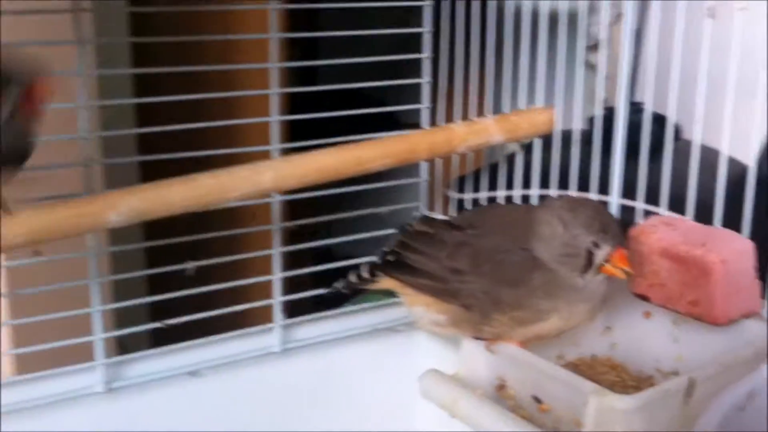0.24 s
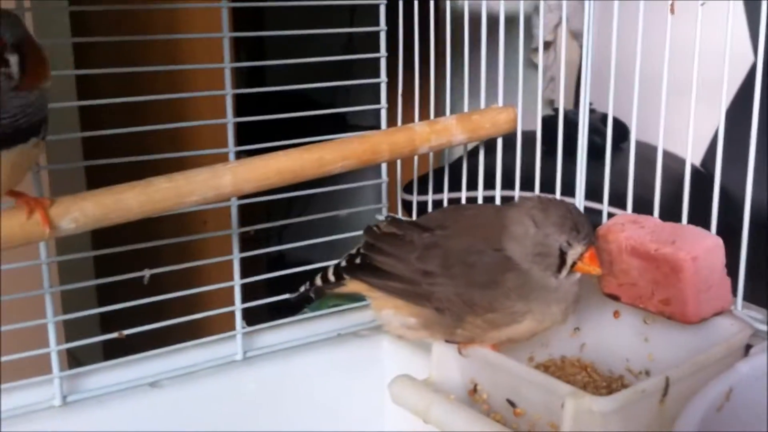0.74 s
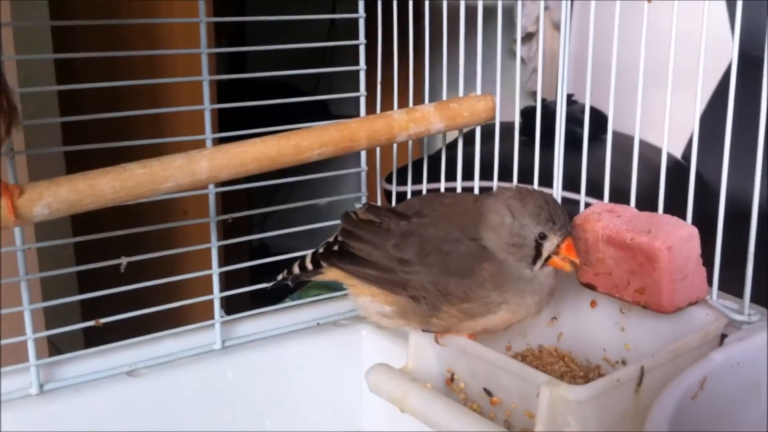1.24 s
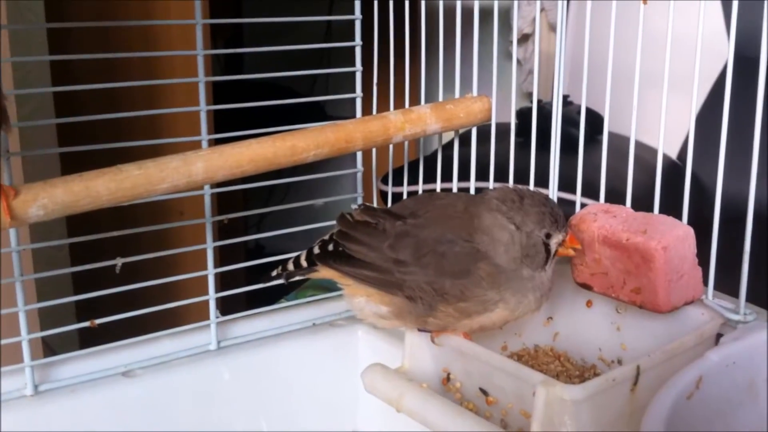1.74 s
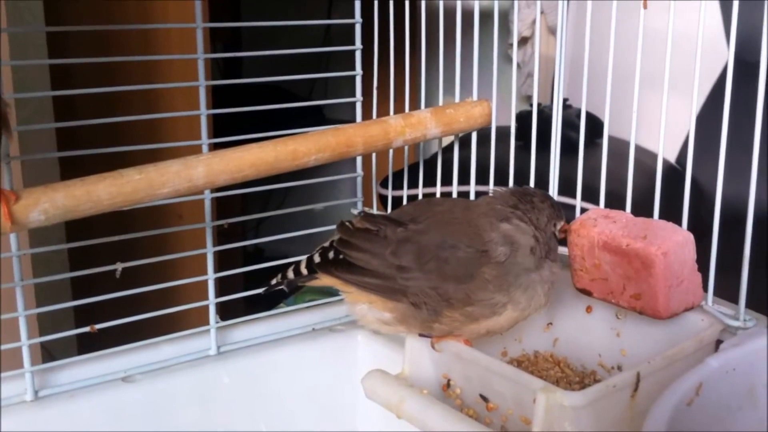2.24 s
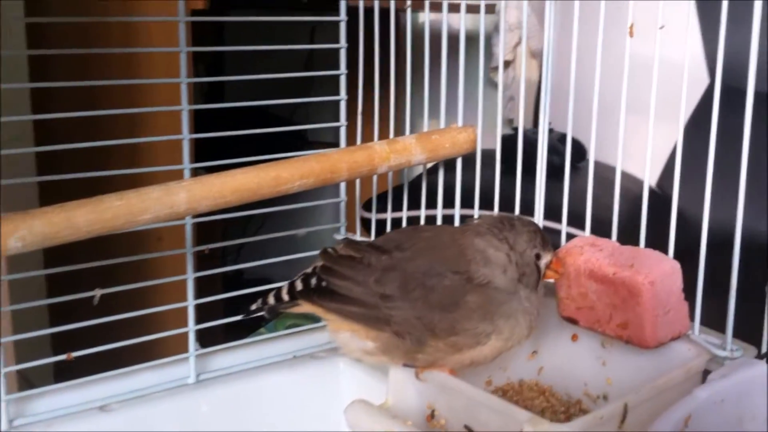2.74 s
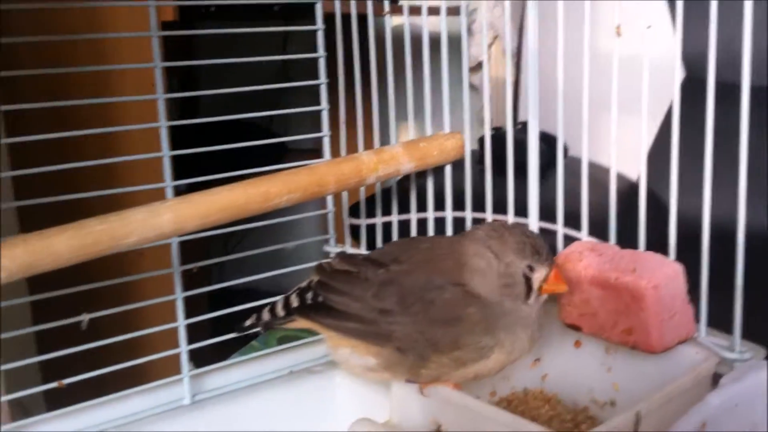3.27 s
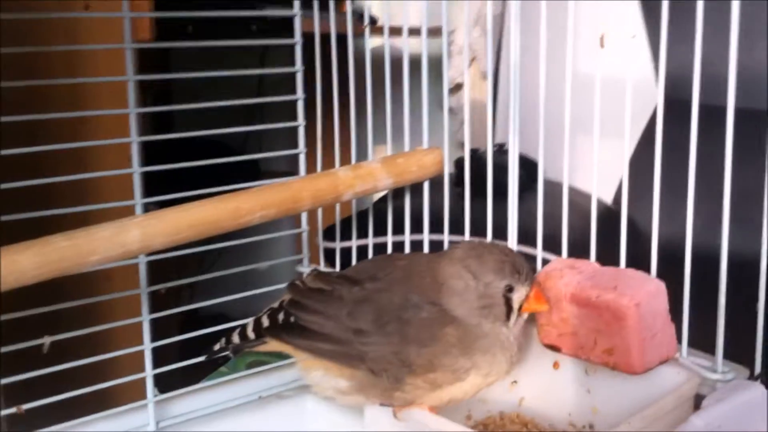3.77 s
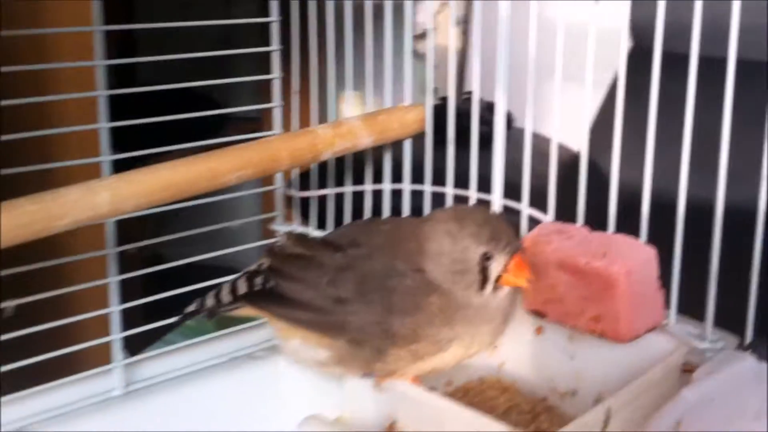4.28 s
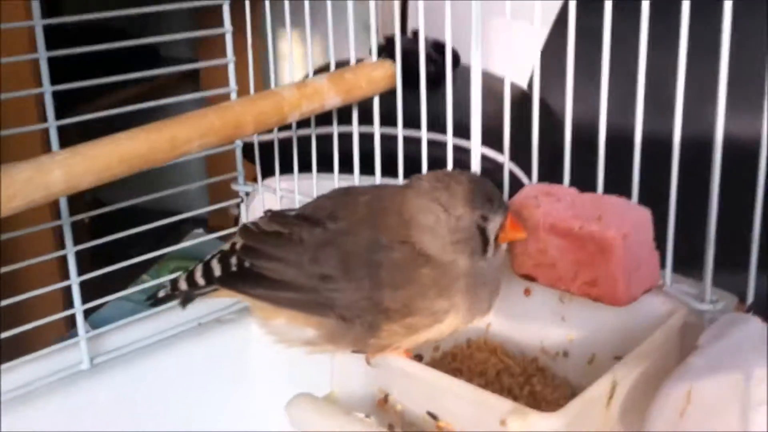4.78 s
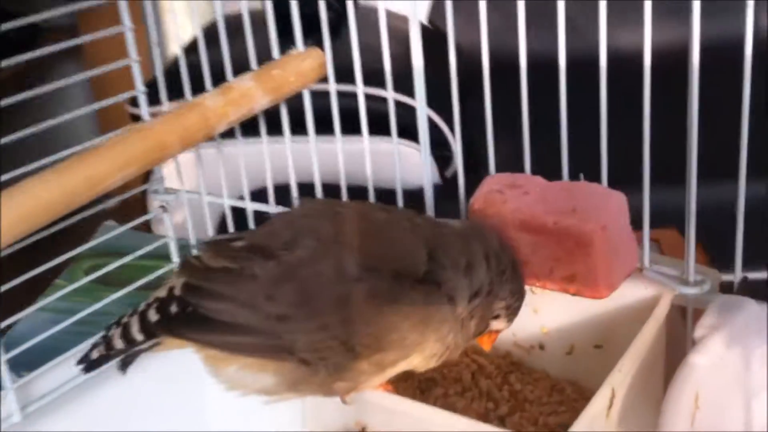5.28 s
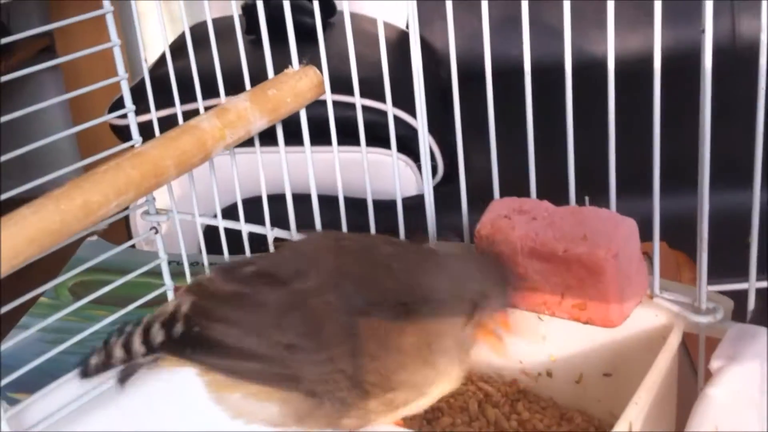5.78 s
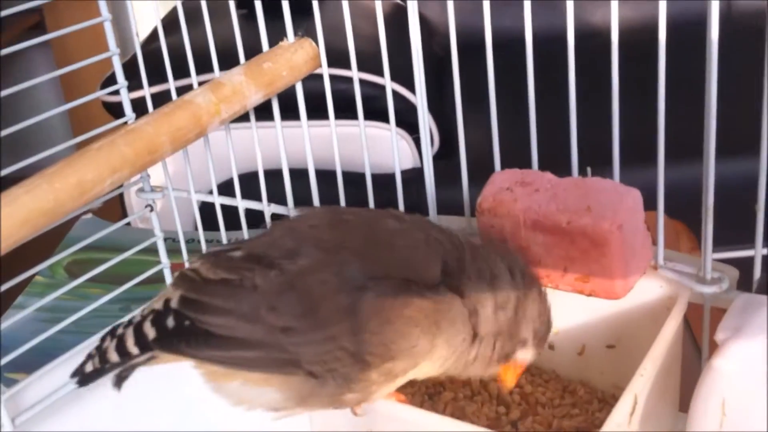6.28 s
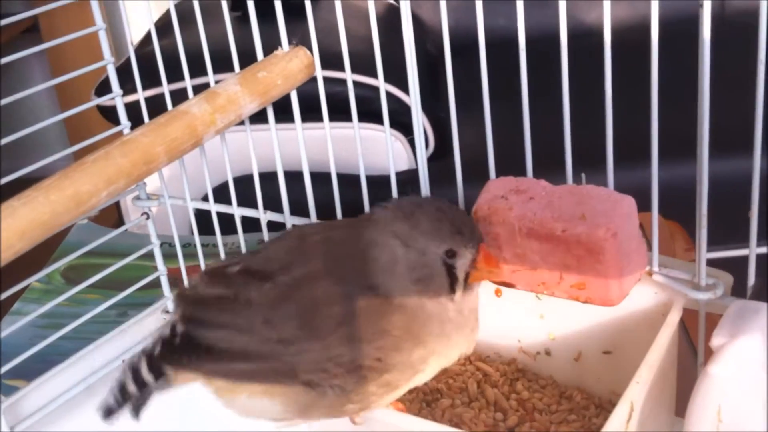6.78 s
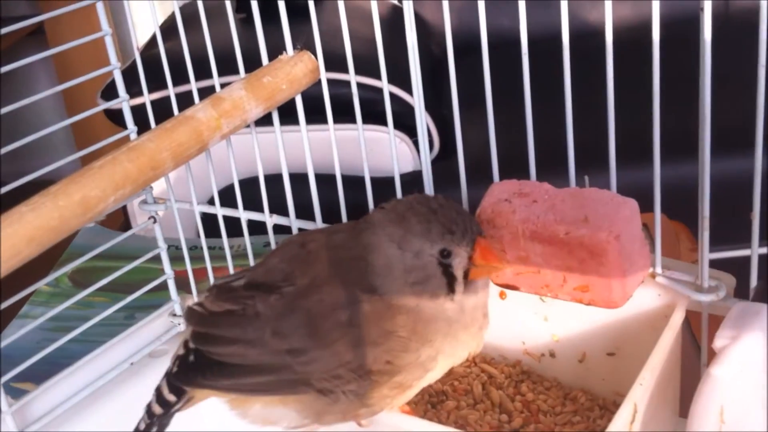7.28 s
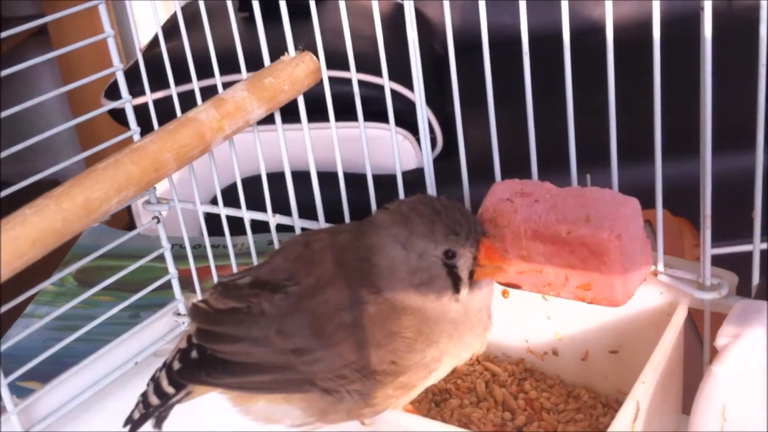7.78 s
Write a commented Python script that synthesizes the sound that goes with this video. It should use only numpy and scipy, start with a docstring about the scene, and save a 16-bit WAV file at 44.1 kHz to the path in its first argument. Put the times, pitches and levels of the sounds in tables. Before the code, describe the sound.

Close mono sound of a small cage bird indoors over very low room murmur and hiss. Light claw taps on perch and bars, then hesitant raspy peeps, lead into a rhythmic, nasal, toy-trumpet-like song. Each half-second phrase runs from chirp through buzzy harmonic tones to a brief thin whistle. Three bouts of three phrases are separated by small pauses and introductory notes, the singing growing brighter and stronger as it goes on.

```python
"""A zebra finch sings in its cage in a quiet room, close to a mono microphone.
Soft introductory notes lead into three bouts of one motif, sung three times in each: a chirp that
runs into a long stack, a swooping stack, a soft buzz and a whistle. Each is a set of gliding harmonics
shaped by throat and beak. Between songs, small taps of ringing noise sound from the cage.
Shaped noise makes the room's murmur and hiss, and random echoes answer the bird and the cage."""
import sys
import numpy as np
from scipy import signal
from scipy.fft import rfft, irfft, next_fast_len
from scipy.io import wavfile
from scipy.ndimage import map_coordinates

SR = 44100
rng = np.random.default_rng(int(sys.argv[2]) if len(sys.argv) > 2 else 0)


def unload_wav(signal):
    """Save mono or channel-first audio to the path in sys.argv[1] as 16-bit WAV at rate SR, clipped to [-1, 1]."""
    wavfile.write(
        sys.argv[1],
        SR,
        np.round(np.clip(np.atleast_2d(signal).T, -1, 1) * 32767).astype(np.int16),
    )


N = 353682  # length in samples, about 8 s
TOP_HZ = 16100  # nothing sounds above this


def amp(db):
    """Turn decibels into an amplitude factor."""
    return 10 ** (np.asarray(db) / 20)


def unit(x):
    """Scale a sound to an average (RMS) strength of 1."""
    return x / np.sqrt(np.mean(x ** 2) + 1e-20)


def along(points, hz):
    """Read a curve of (Hz, value) points on a log frequency axis."""
    f, v = np.transpose(points)
    return np.interp(np.log(hz + 1), np.log(f + 1), v)


def wobble(rate, size):
    """A smooth random curve through `rate` random points a second."""
    knots = rng.standard_normal(int(size * rate / SR) + 4)
    return map_coordinates(knots, [np.arange(size) * rate / SR])


def filtered(x, response):
    """Shape the spectrum of x by a response, given as a function of frequency."""
    m = next_fast_len(len(x) + SR // 2)
    spectrum = rfft(x, m) * response(np.fft.rfftfreq(m, 1 / SR))
    return irfft(spectrum, m)[:len(x)]


def causal(gain):
    """Complex log response of the filter that has this gain and never answers before its input."""
    cepstrum = irfft(np.log(gain))
    half = len(cepstrum) // 2
    return rfft(np.r_[cepstrum[0], 2 * cepstrum[1:half]], 2 * half)


def add(track, s, sound):
    """Mix a sound in at s seconds."""
    start = max(round(s * SR), 0)
    track[start:start + len(sound)] += sound[:max(N - start, 0)]


# Spectrum of the quiet room: pitch_hz, relative_db (per Hz)
HUSH_SPECTRUM = [(15, -36.5), (25, -30.5), (84, -21.5), (206, -8.5), (545, -14.5), (796, -15.5),
                 (2280, -22), (5570, -22.5), (16000, -27)]


def hush(level_db=-65):
    """The low murmur of the house and a faint hiss: shaped noise whose level drifts slowly."""
    noise = filtered(rng.standard_normal(N), lambda hz: amp(along(HUSH_SPECTRUM, hz)))
    return unit(noise) * amp(level_db + 1.2 * wobble(3.6, N))


# Taps on perch and bars: start_s, level_db (the click and ring levels are added)
TAPS = [(0.094, -53.5), (0.123, -41.5), (0.149, -47.5), (0.253, -45.5), (0.386, -45), (3.114, -45),
        (3.155, -45)]
# Resonances of the cage: pitch_hz, width_hz, relative_db
CAGE_RESONANCES = [(279.6, 110, 0), (608, 14, 6), (1052, 59, 6), (1680, 360, -11)]


def taps(click_db=-14, ring_db=-11, click_t60=0.36, ring_t60=0.44):
    """Claws and beak scuff on perch and bars; the cage rattles after. A t60 is seconds to fall 60 dB."""
    track, t = np.zeros(N), np.arange(SR // 2) / SR

    def cage_body(f):
        return sum(amp(db) * 1j * f * width / (centre * centre - f * f + 1j * f * width)
                   for centre, width, db in CAGE_RESONANCES)

    for s, db in TAPS:
        ring = unit(filtered(rng.standard_normal(len(t)), cage_body)) * amp(ring_db - 60 * t / ring_t60)
        click = rng.standard_normal(len(t)) * amp(click_db - 60 * t / click_t60)
        onset = 1 - np.exp(-t / 0.00078)
        add(track, s, amp(db) * (click + ring) * onset)
    return track


EDGE_DB, EDGE_CURVE = 14, 1.98  # a glide swells from and fades to this far below its level, along this power
SAG_OCT_PER_S = 0.756  # a held note sinks slowly
ONSET_ROUGH, SETTLE_S = 0.52, 0.0072  # extra roughness at each start, and how quickly it dies away
END_ROUGH = .3  # extra roughness as the air pressure fails


def gesture_of(glides, count=48):
    """Chain glides of the syrinx, the bird's voice organ, into rows of (s, pitch Hz, level dB, roughness)."""
    u, start, rows = np.linspace(0, 1, count, endpoint=False), 0, []
    for length, start_hz, target_hz, bend, db, attack, release, rough in glides:
        t = u * length
        glide = np.expm1(bend * u) / np.expm1(bend)  # moves late if bend is positive, early if negative
        hz = start_hz * (target_hz / start_hz) ** glide * 2 ** (-SAG_OCT_PER_S * t)
        rising = np.maximum(1 - t / attack, 0)
        fading = np.maximum(1 - (length - t) / release, 0)
        level_db = db - EDGE_DB * np.maximum(rising, fading) ** EDGE_CURVE
        roughness = rough + ONSET_ROUGH * np.exp(-t / SETTLE_S) + END_ROUGH * fading ** 2
        rows.append(np.c_[start + t, hz, level_db, roughness])
        start += length
    return np.vstack(rows)


FOCUS_HZ, FOCUS_WIDTH_HZ = 3900, 1400  # the band that focus_db raises or lowers
FLUTTER_DB = 1.1  # the air pressure trembles a little


def syllable(glides, tract, pitch=1, length=1, treble_db=0, beak_hz=None, dip_hz=None,
             swell_db=0, hoarse=0, climb=0, focus_db=0):
    """The syrinx buzzes along its glides; its harmonics move through the resonances of throat and beak."""
    s, hz, db, rough = np.transpose(gesture_of(glides))
    t = np.arange(int(s[-1] * length * SR)) / SR / length
    size, progress = len(t), t / s[-1] - .5  # progress runs from -0.5 to 0.5
    rough = np.clip(np.hypot(np.interp(t, s, rough), hoarse), 0, 1)
    jitter = .03 * rough * wobble(900, size) + .003 * wobble(120, size)
    f0 = pitch * 2 ** (climb * progress) * np.exp(np.interp(t, s, np.log(hz)) + jitter)

    grid = np.linspace(0, SR / 2, 513)
    colour_db = along(tract, grid) + treble_db * along([(3000, 0.37), (9000, 0.73)], grid)
    colour_db = colour_db + focus_db * np.exp(-((grid - FOCUS_HZ) / FOCUS_WIDTH_HZ) ** 2)
    if beak_hz:  # the gape moves one resonance and one hollow from song to song
        colour_db = colour_db + 8 * np.exp(-((grid - beak_hz) / 600) ** 2)
        colour_db = colour_db - 10 * np.exp(-((grid - dip_hz) / 450) ** 2)
    else:  # short notes take a chance colour from the pose of the head
        colour_db = colour_db + 2.2 * wobble(3000, len(grid))

    k = np.arange(1, int(TOP_HZ / hz.min()) + 1)[:, None]  # harmonic numbers
    partials = np.exp(np.interp(k * f0, grid, causal(amp(colour_db)))) * (k * f0 < TOP_HZ)
    # stretched tight or blown softly, the membranes swing like a sine; slack and blown hard, they snap shut
    level_db = np.interp(t, s, db)
    purity_db = along([(1700, 0.5), (3400, 20.9)], f0) + 0.22 * np.maximum(-3.5 - level_db, 0)
    partials = partials * amp(-(k - 1) * purity_db)
    partials = partials * amp(2.86 * np.array([wobble(46.6, size) for _ in k]))  # each drifts in strength
    partials = partials / np.sqrt(np.sum(abs(partials) ** 2, axis=0) / 2 + 1e-20)

    # where the vibration turns chaotic, every harmonic spreads into a band
    chaos = np.array([wobble(801, size) + 1j * wobble(797.7, size) for _ in k]) / np.sqrt(2)
    smear = .7 * rng.standard_normal(k.shape)  # the harmonics arrive a little out of step
    cycles = np.exp(1j * (2 * np.pi * k * np.cumsum(f0) / SR + smear))
    voice = np.sum(partials * (np.sqrt(1 - rough ** 2) + rough * chaos) * cycles, axis=0).real
    loudness = amp(level_db + swell_db * progress + FLUTTER_DB * wobble(126.8, size))
    return voice * loudness * signal.windows.tukey(size, .03)


# Times of the introductory notes: start_s, level_db (each glide's own level is added)
INTRO_TIMES = [(.425, -49), (.729, -45.5), (0.891, -40), (1.042, -38), (1.372, -37.5), (3.965, -44),
               (4.183, -40), (4.314, -39), (6.347, -36.5)]
# Glides of one note, before softer notes are lowered:
# length_s, start_hz, target_hz, bend, level_db, attack_s, release_s, roughness (0-1)
INTRO_GLIDES = [(.011, 905, 841, 1.7, -7.5, 0.0058, 0.00069, 0),
                (.042, 736.3, 437, -1.2, 1.5, .011, 0.018, 0.23)]
# Throat and beak colour: pitch_hz, relative_db
INTRO_TRACT = [(450, -10.5), (1000, -0.5), (2300, -5), (3300, -7), (5400, -8.5), (6500, -11), (8600, -7),
               (15000, -18.5)]
INTRO_FULL_DB, INTRO_TREBLE_DB = -39.5, 10  # a full-voiced introductory note and its treble tilt
INTRO_OCT_PER_DB, INTRO_TREBLE_PER_DB = .022, 2  # softer ones are lower and duller


def introductory_notes(song):
    """Short rough notes; blown more softly, they sound lower and duller."""
    for s, db in INTRO_TIMES:
        shy_db = max(INTRO_FULL_DB - db, 0)
        note = syllable(INTRO_GLIDES, INTRO_TRACT, 2 ** (-INTRO_OCT_PER_DB * shy_db),
                        treble_db=INTRO_TREBLE_DB - INTRO_TREBLE_PER_DB * shy_db)
        add(song, s, amp(db) * note)


# Glides: length_s (before stretching), start_hz, target_hz, bend, level_db, attack_s, release_s, roughness (0-1)
CHIRP_GLIDES = [(0.0248, 1109, 1011, 3.3, -4.5, 0.0085, 0.0041, .16),
                (.03, 1542, 1096, 3.2, 0, .009, 0.0099, 0.19)]
# Throat and beak colour: pitch_hz, relative_db
CHIRP_TRACT = [(1050, -4.5), (2200, -4.5), (3100, -5), (4300, 3), (6300, -7.5), (9200, -5.5),
               (12500, -19.5), (15000, -15)]


def opening_chirp(stretch, focus_db):
    """Two quick falling glides, stretched with the motif."""
    return syllable(CHIRP_GLIDES, CHIRP_TRACT, length=stretch, focus_db=focus_db)


# Glide: length_s (before stretching), start_hz, target_hz, bend, level_db, attack_s, release_s, roughness (0-1)
STACK_GLIDES = [(.096, 851.4, 700.4, 9, 0, 0.031, 0.017, 0.071)]
# Throat and beak colour: pitch_hz, relative_db
STACK_TRACT = [(800, -14), (1650, -6.5), (3300, 3), (4300, 4), (5000, 1.5), (5800, -8), (7300, -18.5),
               (9100, -4.5), (12700, -32), (15000, -12)]


def long_stack(stretch, beak_hz, dip_hz, focus_db):
    """A held stack of harmonics that drops late, coloured by the gape of the beak."""
    return syllable(STACK_GLIDES, STACK_TRACT, length=stretch, beak_hz=beak_hz, dip_hz=dip_hz,
                    focus_db=focus_db)


# Glides, before the pitch ratio: length_s, start_hz, target_hz, bend, level_db, attack_s, release_s, roughness (0-1)
SWOOP_GLIDES = [(.012, 7546, 1247, .3, -7.5, 0.0048, 0.0046, .5),
                (.041, 884.5, 877, 4.8, -1, 0.008, 0.0015, .04),
                (.047, 590, 466, 1.6, -0.5, .001, 0.024, 0.12)]
# Throat and beak colour: pitch_hz, relative_db
SWOOP_TRACT = [(550, -20), (900, -8), (1750, -9.5), (2700, 1.5), (5100, 1), (6100, -9), (7800, -14),
               (9100, -2.5), (12500, -25), (15000, -10)]
# The bird warms up and its swoop settles: (first motif, last motif)
SWOOP_PITCH = (1.05, .98)  # ratio
SWOOP_SWELL_DB = (3.5, -5)  # the weight moves from the end of the swoop to its start
SWOOP_TREBLE_DB = (-0.5, 3)  # treble tilt
SWOOP_HOARSE = (.32, .02)  # roughness 0-1
SWOOP_GAPE = (1.34, 1.1)  # ratio by which the beak resonance lies higher than in the long stack
SWOOP_DIP_RATIO = 1.125  # the dip is lifted too


def swooping_stack(warmth, beak_hz, dip_hz, focus_db):
    """A steep plunge into lower harmonics; warming up makes it lower, brighter and less hoarse."""
    def warmed(first_last):
        return np.interp(warmth, (0, 1), first_last)

    return syllable(SWOOP_GLIDES, SWOOP_TRACT, warmed(SWOOP_PITCH), treble_db=warmed(SWOOP_TREBLE_DB),
                    beak_hz=warmed(SWOOP_GAPE) * beak_hz, dip_hz=SWOOP_DIP_RATIO * dip_hz,
                    focus_db=focus_db, swell_db=warmed(SWOOP_SWELL_DB), hoarse=warmed(SWOOP_HOARSE))


# Glides: length_s, start_hz, target_hz, bend, level_db, attack_s, release_s, roughness (0-1)
BUZZ_GLIDES = [(.011, 7030, 4500, 0.97, -2.5, 0.0028, 0.0028, .7),
               (0.04, 718, 651, 0.58, -1, 0.011, 0.024, 0.52)]
# Throat and beak colour: pitch_hz, relative_db
BUZZ_TRACT = [(650, -21.5), (1400, -5.5), (7200, -4), (15000, -28.5)]


def soft_buzz():
    """A high rough tick, then a low note whose harmonics are blurred by chaotic vibration."""
    return syllable(BUZZ_GLIDES, BUZZ_TRACT)


# Glides, before the pitch ratio: length_s, start_hz, target_hz, bend, level_db, attack_s, release_s, roughness (0-1)
WHISTLE_GLIDES = [(.029, 2800, 4290, -8, -3, 0.0084, 0.0016, 0.087),
                  (.02, 4400, 750, -2, -20, 0.00075, 0.0054, 0.71)]
# Throat and beak colour: pitch_hz, relative_db
WHISTLE_TRACT = [(4300, -13.5), (12500, -17)]
WHISTLE_PITCH = (1.035, 0.97)  # ratio in the first and last motif
WHISTLE_FADE_DB = -11  # the whistle runs out of air


def whistle(warmth, climb):
    """A high, almost pure tone from tight membranes, with a faint falling tail."""
    pitch = np.interp(warmth, (0, 1), WHISTLE_PITCH)
    return syllable(WHISTLE_GLIDES, WHISTLE_TRACT, pitch, swell_db=WHISTLE_FADE_DB, climb=climb)


# The motifs; each glide's own level is added to the levels here:
# start_s, whistle_start_s, level_db, beak_resonance_hz, dip_hz, whistle_level_db, whistle_climb_octaves
MOTIFS = [(1.537, 1.889, -23, 3130, 2600, -22, 0.3), (2.034, 2.393, -23.5, 3100, 2240, -25.5, 0.023),
          (2.546, 2.907, -22.3, 3148, 2340, -27, .36), (4.478, 4.833, -23.5, 3690, 3240, -23, 0.16),
          (4.976, 5.343, -22.5, 3100, 6870, -22.5, .05), (5.577, 5.938, -20.5, 3800, 5230, -20, -0.055),
          (6.507, 6.871, -19.5, 3550, 5700, -17.5, .05), (7.023, 7.392, -19.5, 3460, 5850, -18.5, 0.034),
          (7.657, 8.022, -19.5, 3450, 5680, -16, 0)]
# The motif keeps its rhythm, stretched to fit between chirp and whistle: usual delays after the chirp (s)
STACK_DELAY, SWOOP_DELAY, BUZZ_DELAY, WHISTLE_DELAY = 0.048, .177, .305, .361
BUZZ_DB = -38  # the same in every motif; the glide levels are added
FOCUS_FROM_DB, FOCUS_PER_DB = -21, -0.3  # motifs softer than this gain in the focus band, louder ones lose


def motifs(song):
    """Chirp, long stack, swoop, soft buzz and whistle in a fixed rhythm."""
    for s, whistle_s, db, beak_hz, dip_hz, whistle_db, climb in MOTIFS:
        stretch = np.clip((whistle_s - s) / WHISTLE_DELAY, .5, 2)
        focus_db = FOCUS_PER_DB * (db - FOCUS_FROM_DB)
        warmth = np.interp(s, (MOTIFS[0][0], MOTIFS[-1][0]), (0, 1))

        def sing(delay, level_db, sound):
            add(song, s + delay * stretch, amp(level_db) * sound)

        sing(0, db, opening_chirp(stretch, focus_db))
        sing(STACK_DELAY, db, long_stack(stretch, beak_hz, dip_hz, focus_db))
        sing(SWOOP_DELAY, db, swooping_stack(warmth, beak_hz, dip_hz, focus_db))
        sing(BUZZ_DELAY, BUZZ_DB, soft_buzz())
        sing(WHISTLE_DELAY, whistle_db, whistle(warmth, climb))


def finch():
    """The whole song; so small a bird radiates almost nothing in the bass."""
    song = np.zeros(N)
    introductory_notes(song)
    motifs(song)
    low_cut = signal.butter(4, 317, 'highpass', fs=SR, output='sos')  # Hz
    return signal.sosfilt(low_cut, song)


# How long the room rings: pitch_hz, t60_s (time to fall 60 dB)
ROOM_DECAY = [(500, 0.47), (3500, 0.46), (15000, 0.31)]
# Colour of the ringing: pitch_hz, relative_db
ROOM_COLOUR = [(500, -6), (1040, -0.5), (1300, -6), (1750, 1.5), (4500, -4), (14000, -2)]


def room(x, wet_db=-11.5, near_db=-15, build_s=0.0011, count=16):
    """Near surfaces and the room answer; as the bird turns its head, one random answer blends into the next."""
    out, time = np.zeros(N), np.arange(N) / N * count
    for turn in range(count + 1):
        hz, t, z = signal.stft(rng.standard_normal(SR * 3 // 4), SR, nperseg=256)
        decay_db = along(ROOM_COLOUR, hz)[:, None] - 60 * t / along(ROOM_DECAY, hz)[:, None]
        fade = amp(decay_db) * (1 - np.exp(-t / build_s))
        tail = signal.istft(z * fade, SR, nperseg=256)[1]
        answer = amp(wet_db) * tail / np.linalg.norm(tail)
        # five early echoes from near surfaces
        echo_at = (rng.uniform(.0008, .006, size=5) * SR).astype(int)
        answer[echo_at] += amp(near_db) * rng.uniform(-1.29, 1, size=5)
        share = np.maximum(1 - abs(time - turn), 0) ** .5
        out += signal.fftconvolve(x * share, answer)[:N]
    return out


def scene():
    """Bird and cage with their echoes over the quiet room, the same in both channels."""
    cage = finch() + taps()
    return np.tile(cage + room(cage) + hush(), (2, 1))


def record(dry):
    """The recorder keeps nothing above its band limit."""
    return np.array([filtered(channel, lambda hz: hz < TOP_HZ) for channel in dry])


dry = scene()
out = record(dry)
unload_wav(out)
```